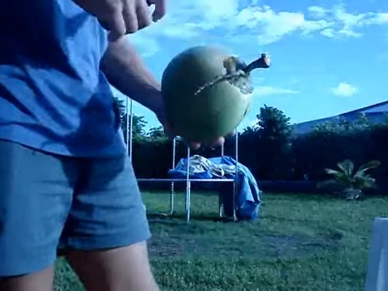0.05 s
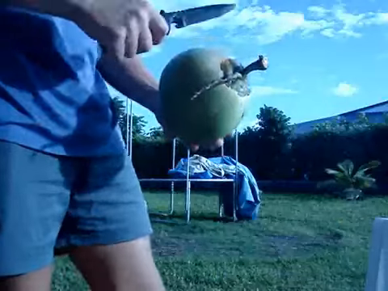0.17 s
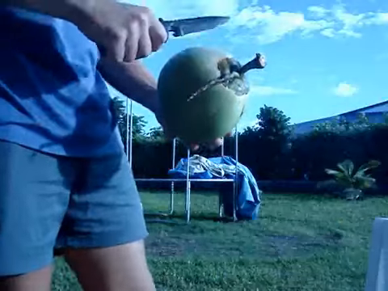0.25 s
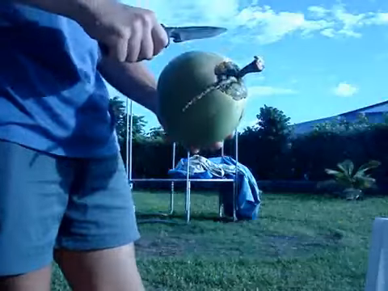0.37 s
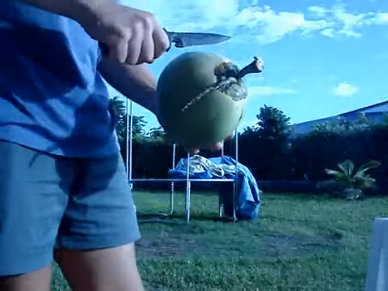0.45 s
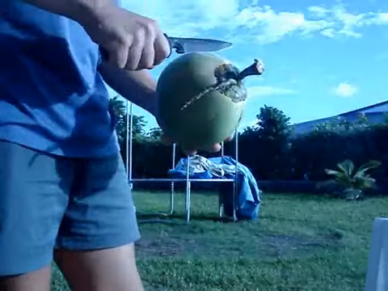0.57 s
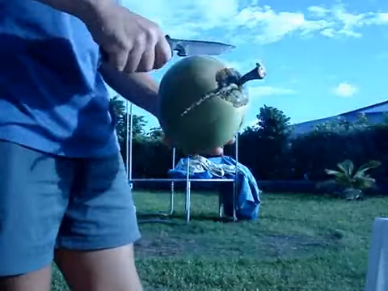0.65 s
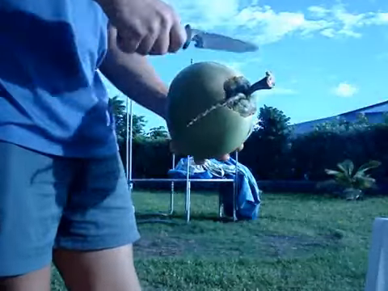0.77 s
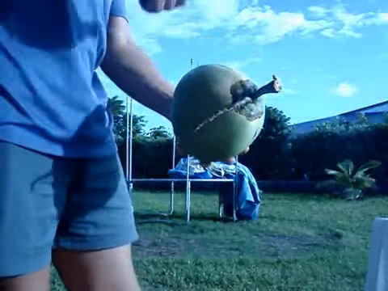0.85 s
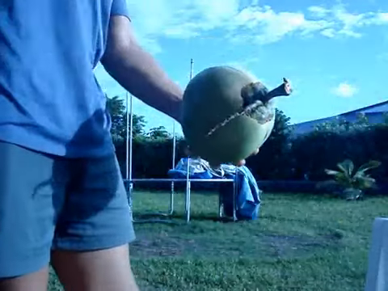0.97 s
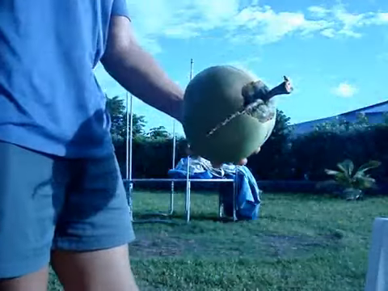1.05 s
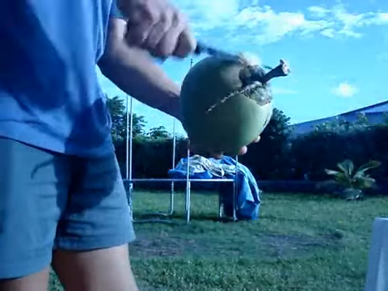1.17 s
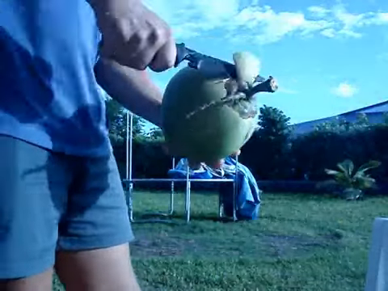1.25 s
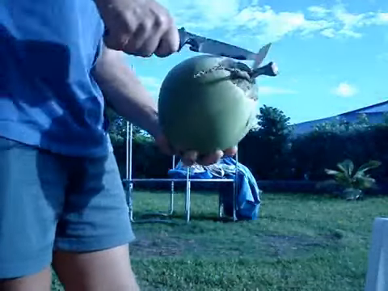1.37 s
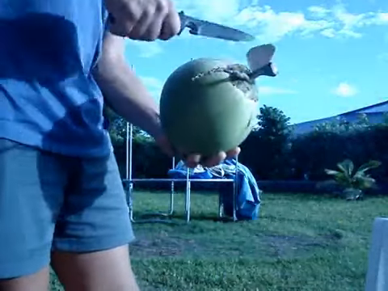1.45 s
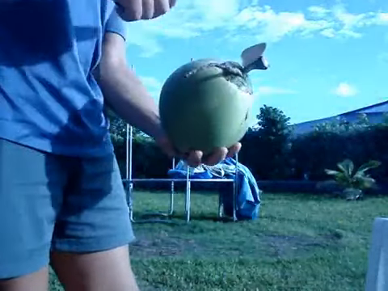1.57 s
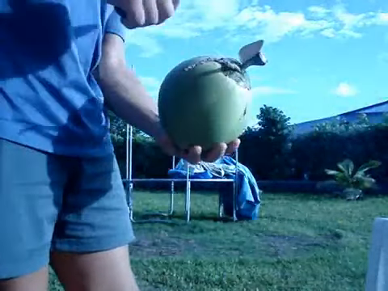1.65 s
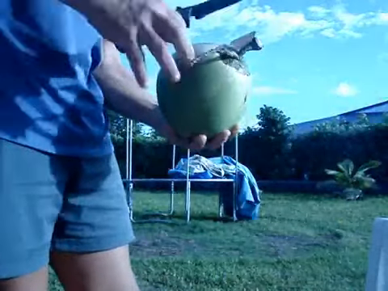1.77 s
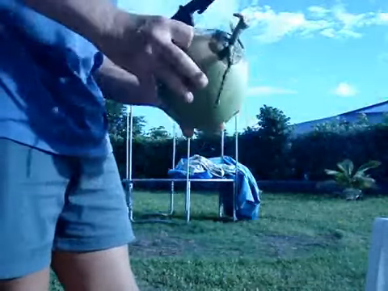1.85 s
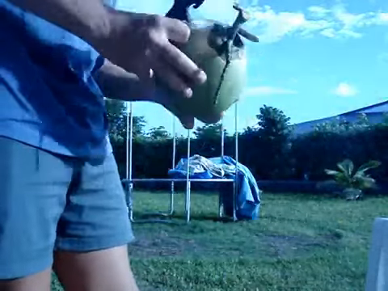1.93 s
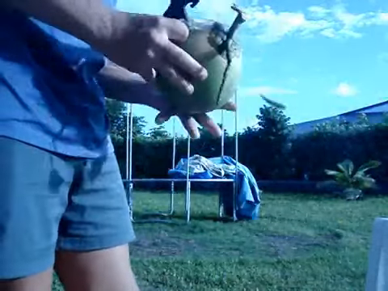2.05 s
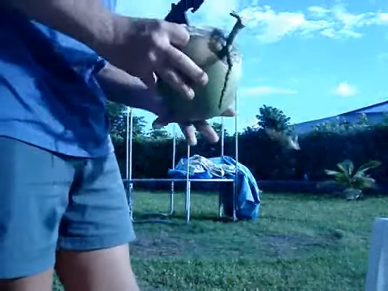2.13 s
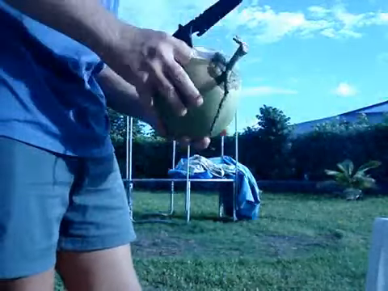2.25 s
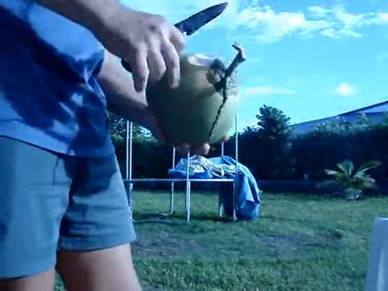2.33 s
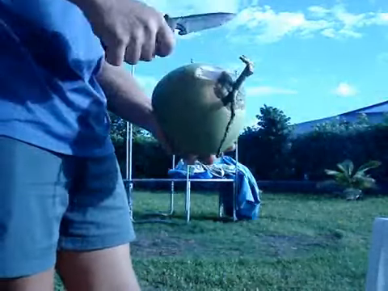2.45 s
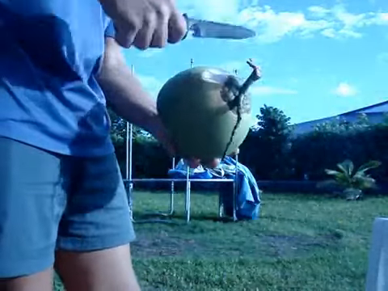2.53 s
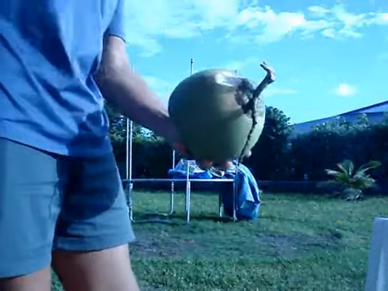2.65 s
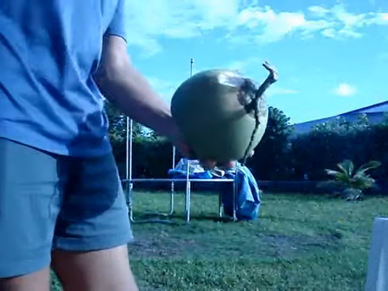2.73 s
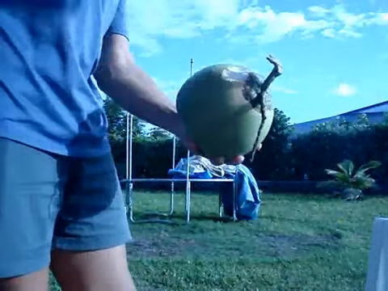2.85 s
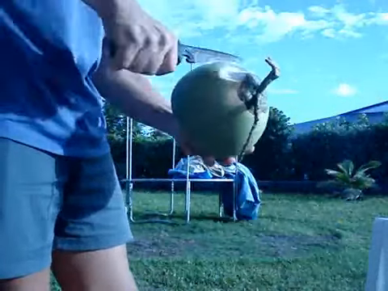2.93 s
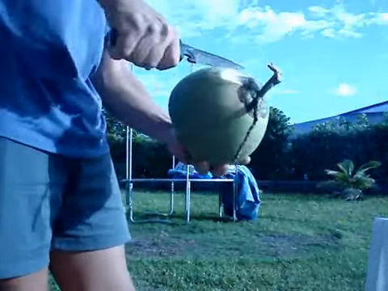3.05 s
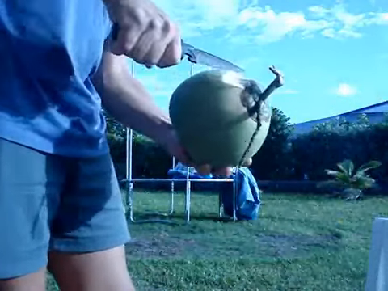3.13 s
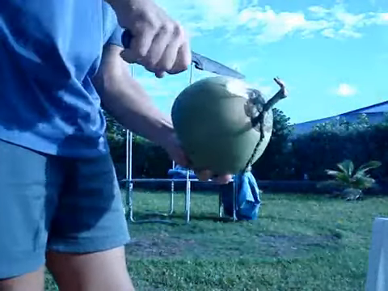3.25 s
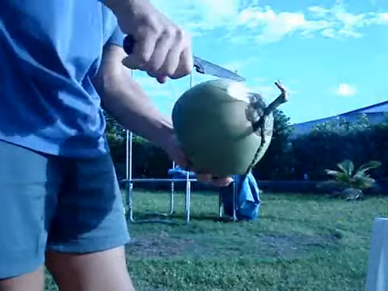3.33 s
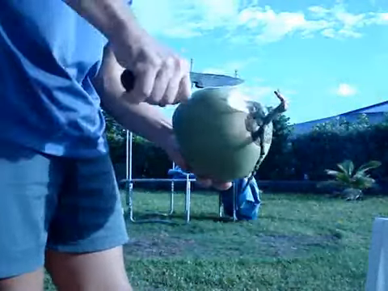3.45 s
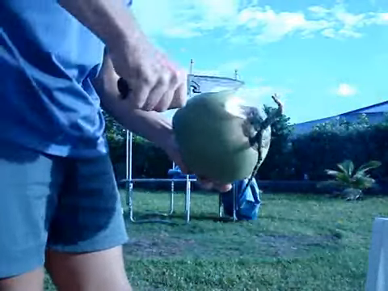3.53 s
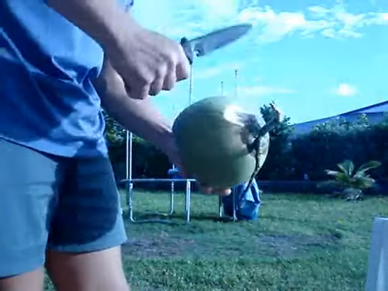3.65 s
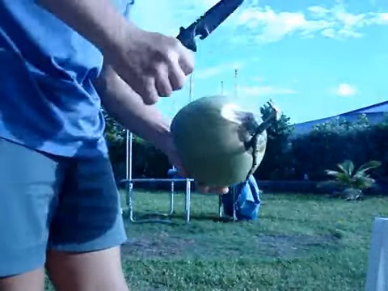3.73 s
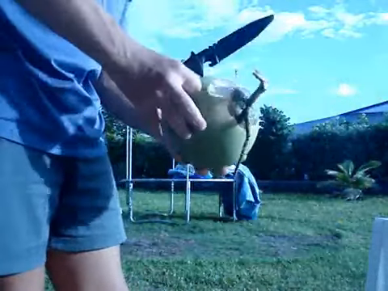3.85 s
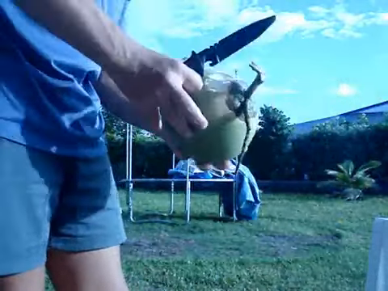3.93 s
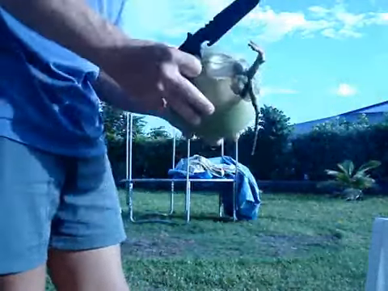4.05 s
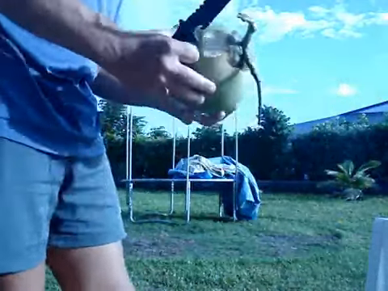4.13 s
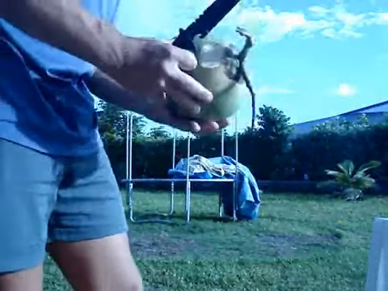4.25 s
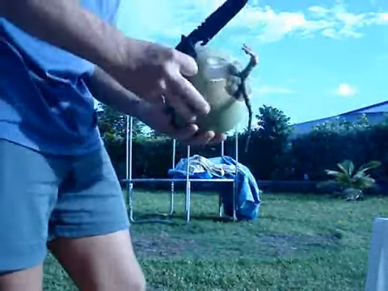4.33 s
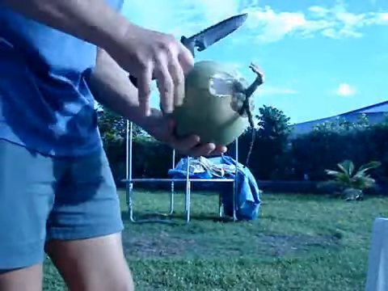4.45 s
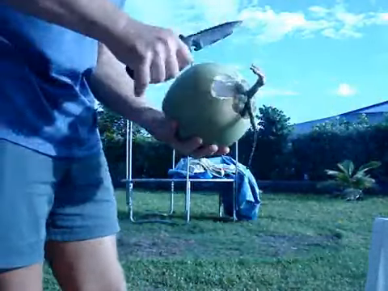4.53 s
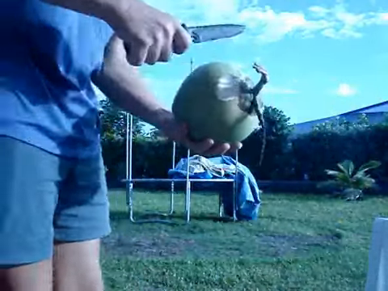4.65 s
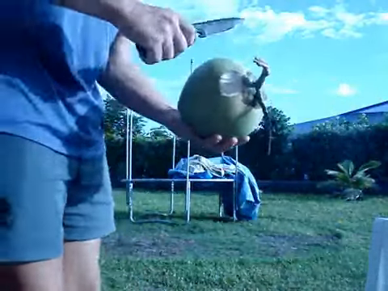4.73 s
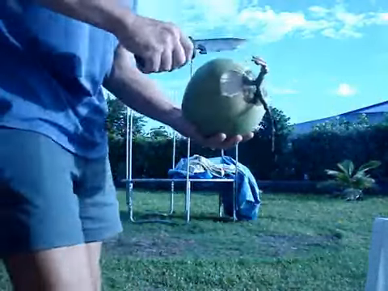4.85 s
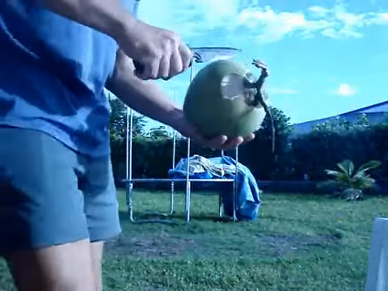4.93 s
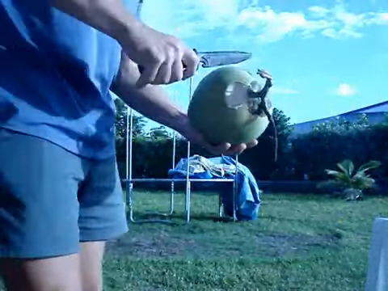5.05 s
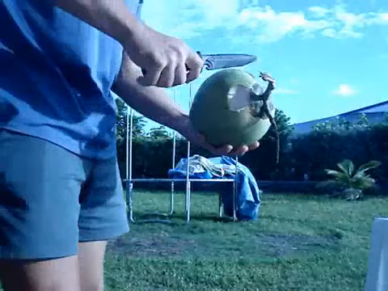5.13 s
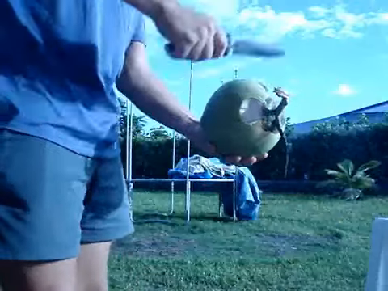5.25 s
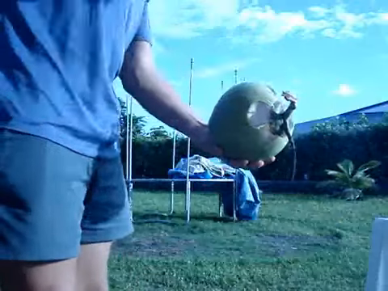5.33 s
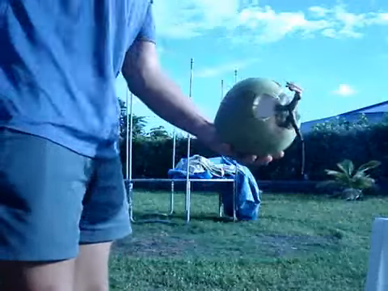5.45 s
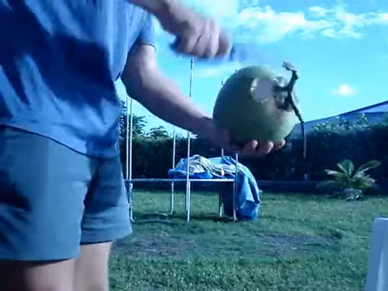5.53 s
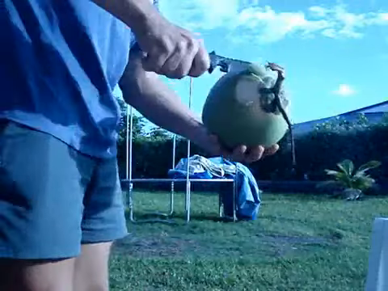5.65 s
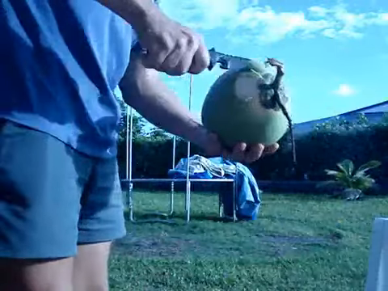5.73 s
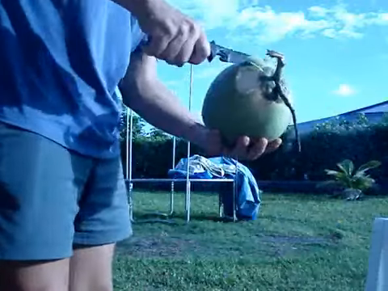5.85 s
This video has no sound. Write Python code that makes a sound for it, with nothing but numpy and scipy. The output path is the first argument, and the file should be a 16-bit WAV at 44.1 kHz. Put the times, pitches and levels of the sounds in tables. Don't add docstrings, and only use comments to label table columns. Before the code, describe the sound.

Outdoors on a lawn, a knife strikes a hand-held green coconut three times, each blow a very brief, dry, fibrous crack with a hollow woody knock. The first is followed at once by a tiny tearing rip. A light tick comes before the second chop and a barely audible touch before the third. A close wall slaps each hit back, with a short dull tail. A small mono microphone hisses steadily.

```python
import sys
import numpy as np
from scipy import signal
from scipy.fft import rfft, irfft, next_fast_len
from scipy.io import wavfile

SR = 44100
rng = np.random.default_rng(int(sys.argv[2]) if len(sys.argv) > 2 else 0)


def to_wav(sig):
    pcm = np.clip(np.atleast_2d(sig), -1, 1) * 32767
    pcm = np.round(pcm).astype(np.int16)
    wavfile.write(sys.argv[1], SR, pcm.T)


def ratio(d):
    e = np.asarray(d, float) / 20
    return 10 ** e


N = 259749

# start_s, crunch_db, bite_ms, wall_lag_ms, wall_db (lag and level of the
BLOWS = [
    (1.3508, -23, 4.5, 9.4, -13),
    (2.5940, -39, 1.65, 11.9, 1.5),
    (3.0927, -22.5, 4.3, 9.7, -10),
    (5.249, -49.5, 2.5, 10, -3),
    (5.7599, -23, 5.8, 10.1, -6.5),
]


def rms_one(x):
    return x / np.sqrt(np.mean(x ** 2) + 1e-20)


def coloured(x, spectrum):
    size = next_fast_len(len(x) + 2048)
    hz = np.maximum(np.arange(size // 2 + 1) * SR / size, 1)
    corner_hz, corner_db = np.transpose(spectrum)
    level_db = np.interp(np.log(hz), np.log(corner_hz), corner_db)
    cepstrum = irfft(level_db * np.log(10) / 20, size)
    cepstrum[1:size // 2] *= 2
    cepstrum[size // 2 + 1:] = 0
    return irfft(rfft(x, size) * np.exp(rfft(cepstrum)), size)[:len(x)]


def steady_noise():
    # pitch_hz, level_db
    hiss_colour = [(12, -42), (20, -25), (38, -11), (92, -4.5), (215, -0.5), (258, -0.5), (287, -1.5),
                   (319, 0), (1100, -4), (4710, -14.5), (5660, -14.5), (6810, -18.5), (8190, -19.5),
                   (11000, -27), (14200, -60), (22000, -120)]
    level_db, edge_hz = -50, 11030
    noise = coloured(rng.standard_normal(N + SR), hiss_colour[:-2])[SR:]
    hz = np.arange(N // 2 + 1) * SR / N
    return ratio(level_db) * rms_one(irfft(rfft(noise) * (hz < edge_hz), N))


def hiss():
    # pitch_hz, level_db (rms)
    whine_tones = [(8000, -80), (8123, -75)]
    gust_db, gusts_per_s, gust_top_hz = 1.5, 6.4, 900
    t = np.arange(N) / SR
    wander = np.cumsum(rng.normal(0, .02, N))
    noise = steady_noise()
    bass = signal.sosfiltfilt(signal.butter(1, gust_top_hz, fs=SR, output="sos"), noise)
    swell = ratio(gust_db * np.interp(t * gusts_per_s, np.arange(200), rng.standard_normal(200)))
    whine = sum(np.sqrt(2) * ratio(db) * np.sin(2 * np.pi * hz * t + wander) for hz, db in whine_tones)
    return noise + (swell - 1) * bass + whine


def slips():
    slip_moments = [.23, 1.0, 2.11, 2.81, 3.39, 3.65, 4.34, 4.39, 4.62, 5.20, 5.29, 5.46]
    level_db, lowest_hz, octaves = -2, 4200, 1.1
    size = 2048
    noise, side = steady_noise(), np.zeros(N)
    for s, chance in zip(slip_moments, rng.random(len(slip_moments))):
        low_hz = lowest_hz * 2 ** (octaves * chance ** 2)
        frame = slice(round(s * SR) - size // 2, round(s * SR) + size // 2)
        band = signal.butter(4, [low_hz, low_hz * 1.3], "band", fs=SR, output="sos")
        side[frame] += signal.sosfilt(band, noise[frame]) * np.hanning(size)
    return ratio(level_db) * side * [[1], [-1]]


def fibres(ms):
    strength = ratio(np.minimum(rng.exponential(1, len(ms)), 3))
    sign = rng.choice([-1, 1], len(ms))
    breaks = rng.random(len(ms)) < .5
    return strength * sign * breaks


def crunch(ms, level_db, bite_ms, colour):
    entry_db, entry_db_per_ms, dying_ms = -5, 5, 2.4
    entry = ratio(entry_db + entry_db_per_ms * np.minimum(ms, 0)) * (ms < 0)
    bite = np.exp(-np.maximum(ms - bite_ms, 0) / dying_ms) * (ms >= 0)
    sound = coloured(fibres(ms) * (entry + bite), colour)
    return ratio(level_db) * sound / np.std(sound[(ms >= 0) & (ms < bite_ms)])


def ring(clicks, hz, t60):
    r, w = ratio(-60 / (t60 * SR)), 2 * np.pi * hz / SR
    return signal.lfilter([0, np.sin(w)], [1, -2 * r * np.cos(w), r * r], clicks)


def snaps(ms, blow_s, bite_ms):
    # start_s, peak_db, pitch_hz
    thick_fibres = [(1.351, -18, 2580), (1.3512, -17, 1255), (1.3531, -19, 2310), (1.3533, -22, 625),
                    (1.353, -40, 150), (1.3600, -26, 1010), (1.3602, -18, 4700), (1.361, -23, 1910),
                    (1.362, -31.5, 415), (2.5943, -32, 2980), (2.5957, -33, 3510), (2.5957, -36, 5150),
                    (3.0926, -7.5, 2670), (3.0946, -16, 1280), (3.0950, -19, 3400), (3.095, -26.5, 380),
                    (3.0930, -33, 170), (3.0962, -28, 703), (3.1018, -19, 3290), (3.1030, -17.5, 4000),
                    (3.1075, -25, 2400), (5.7612, -14.5, 2180), (5.7621, -29, 754), (5.7625, -11.5, 1380),
                    (5.762, -41, 150), (5.7626, -24, 3800), (5.7642, -19, 2230), (5.7700, -16, 2000),
                    (5.7717, -22, 1126)]
    ring_cycles, cycles_db_per_db, stopped_longer, longest_ring_s = 12.5, 0.36, 1.35, 0.038
    out = np.zeros(len(ms))
    for s, peak_db, hz in thick_fibres:
        after_ms = (s - blow_s) * 1000
        if abs(after_ms) < 20:
            cycles = ring_cycles * ratio(-cycles_db_per_db * peak_db)
            if after_ms > bite_ms:
                cycles *= stopped_longer
            click = -ratio(peak_db) * (np.arange(len(ms)) == np.searchsorted(ms, after_ms))
            out += ring(click, hz, min(cycles / hz, longest_ring_s))
    return out


def wall(direct, lag_ms, wall_db):
    smear_ms, rough, low_hz = 1.1, 0.15, 1530
    ms = np.arange(SR // 20) / SR * 1000
    facets = rough * np.exp(-np.maximum(ms - lag_ms, 0) / smear_ms) * rng.standard_normal(len(ms))
    flat_face = np.arange(len(ms)) == np.searchsorted(ms, lag_ms)
    echo = facets * (ms > lag_ms) + flat_face
    echo = signal.sosfilt(signal.butter(1, low_hz, "high", fs=SR, output="sos"), echo)
    return ratio(wall_db) * signal.fftconvolve(direct, echo / np.linalg.norm(echo))[:len(direct)]


def yard(ms, yard_db, colour):
    start_ms, hold_ms, t60_s = 13.5, 34.3, 0.38
    lump_db, lump_ms = 1.5, 4.0
    since = ms - start_ms
    lumps_db = lump_db * np.interp(since / lump_ms, np.arange(500), rng.standard_normal(500))
    fall_db = 0.069 * np.maximum(since - hold_ms, 0) / t60_s
    fading = np.clip(since / 6, 0, 1) * ratio(lumps_db - fall_db)
    return ratio(yard_db) * fading * rms_one(coloured(rng.standard_normal(len(ms)), colour))


def chops():
    # pitch_hz, level_db
    crunch_colours = [
        [(88, -32), (150, -19), (609, 1.5), (1320, -5), (1730, -2), (2390, 12), (3070, -6), (4810, -2),
         (6300, -5), (9700, -8), (11000, -22), (14300, -60), (22000, -120)],
        [(710, -50), (1200, -16), (2040, -11), (2640, -12), (3000, 0), (4040, -16), (5240, -6), (8890, -16),
         (11000, -29), (14300, -64), (22000, -120)],
        [(88, -40), (150, -26), (812, -3.5), (1300, -15), (1790, 0), (2520, -1), (3810, -6), (4730, -2.5),
         (6190, -14), (9700, -12.5), (11000, -22), (14300, -53), (22000, -120)],
        [(600, -22), (1500, 2), (3000, 4), (6000, -8), (11000, -19)],
        [(88, -48), (150, -26), (873, -36), (1420, -3.5), (2300, -10), (2860, -12), (4400, -9), (5170, -19),
         (6650, -16), (7150, -17.5), (11000, -25), (14300, -63), (22000, -120)],
    ]
    # pitch_hz, level_db
    yard_colours = [
        [(120, -48), (200, -22), (385, 0.5), (556, -6.5), (625, 1), (875, -8), (1180, -1), (1330, -13),
         (1920, -4.5), (7360, -16.5), (11000, -26.5), (14300, -61), (22000, -120)],
        [(120, -53), (200, -31), (315, -4), (372, -13), (715, -6), (904, -16), (1160, -2), (1500, -17),
         (2520, -5.5), (2830, -9.5), (9620, -28), (11000, -31), (14300, -66), (22000, -120)],
        [(120, -63), (200, -7.5), (366, -4), (575, -18), (752, -4), (875, -17), (1160, -3.5), (1630, -9),
         (1990, -8.5), (9300, -26), (11000, -29), (14300, -60), (22000, -120)],
    ]
    hard_blow_db, hard_yard_db, yard_follows = -23, -36.5, 1.2
    bass_cut_hz = 250
    lead, length = SR // 60, SR // 2
    ms = (np.arange(length) - lead) / SR * 1000
    out = np.zeros(N + SR)
    returns = [yard_colours[0], crunch_colours[1], yard_colours[1], crunch_colours[3], yard_colours[2]]
    for blow, colour, back in zip(BLOWS, crunch_colours, returns):
        s, level_db, bite_ms, lag_ms, wall_db = blow
        direct = crunch(ms, level_db, bite_ms, colour) + snaps(ms, s, bite_ms)
        yard_db = hard_yard_db + yard_follows * (level_db - hard_blow_db)
        start = round(s * SR) - lead
        out[start:start + length] += direct + wall(direct, lag_ms, wall_db) + yard(ms, yard_db, back)
    return signal.sosfilt(signal.butter(2, bass_cut_hz, "high", fs=SR, output="sos"), out[:N])


def tear():
    start_s, end_s = 1.357, 1.3733
    level_db, hz, width_hz = -27.5, 4340, 1250
    t = np.arange(N) / SR
    rip = ring(fibres(t), hz, 2.3 / width_hz)
    span = np.clip((t - start_s) / .005, 0, 1) * np.clip((end_s - t) / .0008, 0, 1)
    return ratio(level_db) * rms_one(rip) * span


def starve(x, share_lost, size, count):
    hz, s, cells = signal.stft(x, SR, nperseg=size)
    luck = rng.random((len(hz), len(s)))
    luck = luck.repeat(count, axis=0).repeat(2, axis=1)[:len(hz), :len(s)]
    kept = luck >= share_lost(hz[:, None], s)
    return signal.istft(cells * kept, SR, nperseg=size)[1][:, :N]


def steady_loss(hz, s):
    # time_s, share_lost (0-1)
    top_loss = [(0, 0), (1.6, 0), (1.8, .55), (3.5, .5), (3.9, .33), (5.89, .33)]
    top_hz, upper_hz, upper_share = 10000, 7000, .18
    spared = sum((s > blow[0] - .04) & (s < blow[0] + .1) for blow in BLOWS)
    reach = np.where(hz > top_hz, 1, upper_share * (hz > upper_hz))
    return reach * np.interp(s, *np.transpose(top_loss)) * (spared == 0)


def sudden_loss(hz, s):
    # start_s, length_s, above_hz, share_lost (0-1)
    dropouts = [
        (2.572, .0195, 3000, .9),
        (2.615, .017, 3500, .85),
        (3.110, .0035, 6000, 1),
        (5.739, .0145, 1300, 1),
        (5.777, .008, 5000, .7),
    ]
    recovery, recovery_lost = .4, .4
    total = 0
    for start, length, above_hz, lost in dropouts:
        during = (s > start) & (s < start + length * (1 + recovery))
        depth = np.where(s < start + length, 1, recovery_lost)
        total = total + (hz > above_hz) * lost * (during * depth)
    return total


def scene():
    return np.tile(hiss() + chops() + tear(), (2, 1))


def roll_off(x):
    return signal.sosfilt(signal.butter(12, 11810, fs=SR, output="sos"), x)


def record(dry):
    thinned = starve(dry, sudden_loss, size=256, count=8)
    thinned = starve(thinned, steady_loss, size=2048, count=3)
    top_cut = signal.cheby2(12, 60, 12200, fs=SR, output="sos")
    mix = signal.sosfilt(top_cut, thinned + slips())
    return roll_off(mix)


dry = scene()
out = record(dry)
to_wav(out)
```